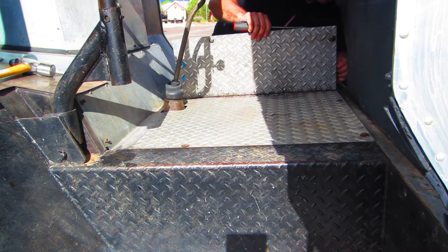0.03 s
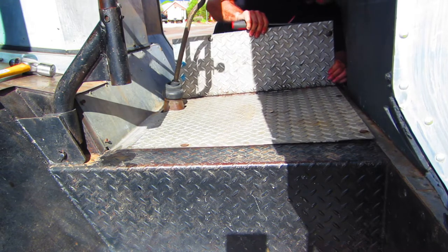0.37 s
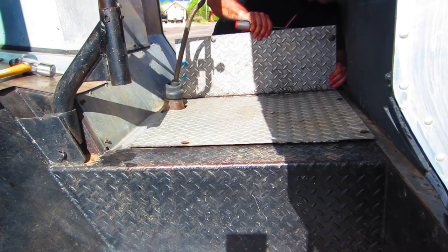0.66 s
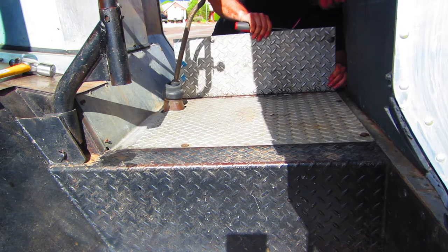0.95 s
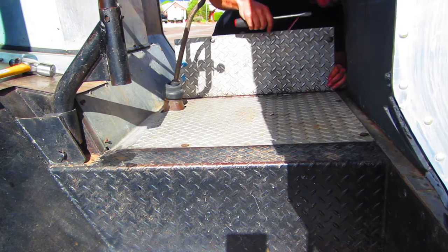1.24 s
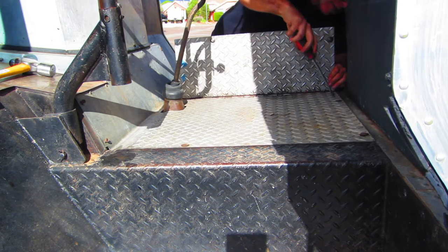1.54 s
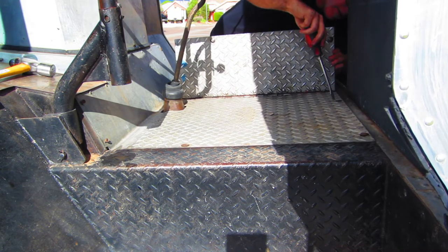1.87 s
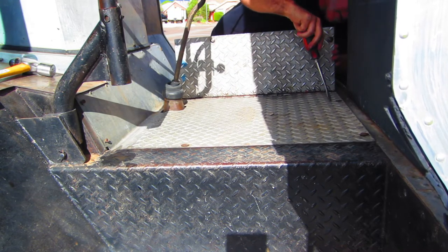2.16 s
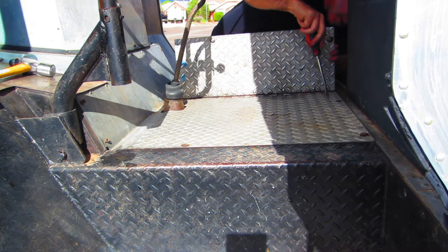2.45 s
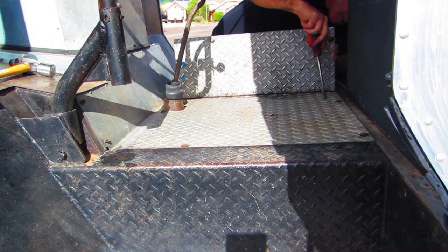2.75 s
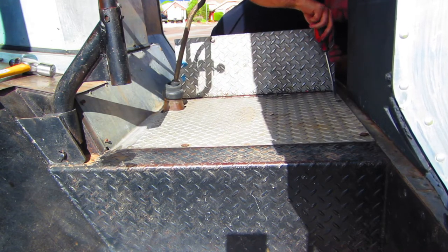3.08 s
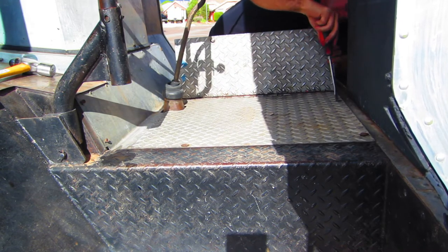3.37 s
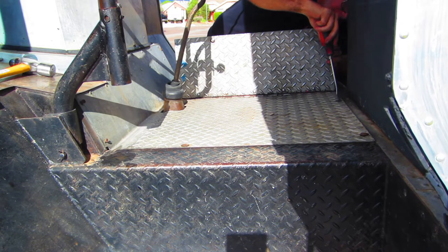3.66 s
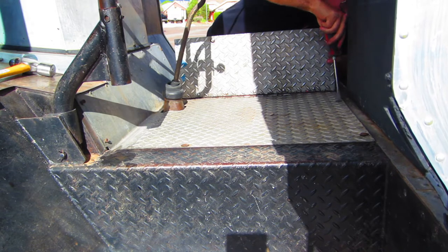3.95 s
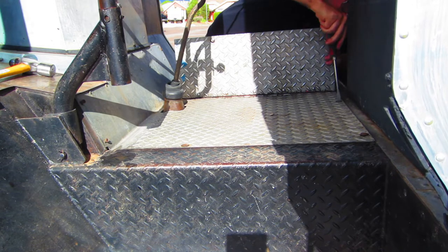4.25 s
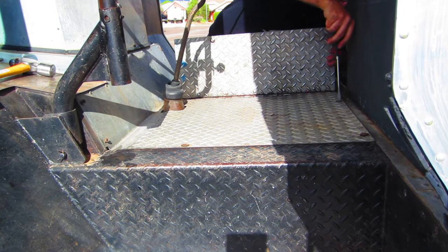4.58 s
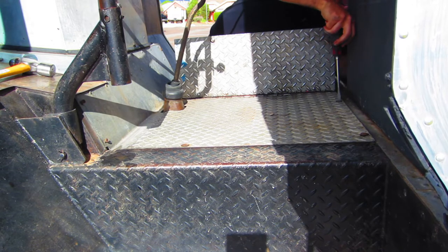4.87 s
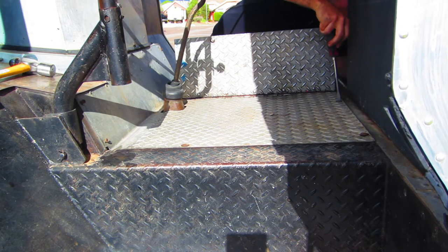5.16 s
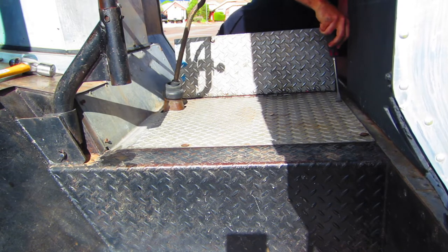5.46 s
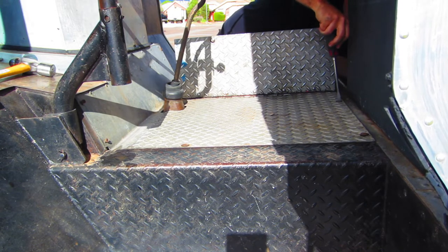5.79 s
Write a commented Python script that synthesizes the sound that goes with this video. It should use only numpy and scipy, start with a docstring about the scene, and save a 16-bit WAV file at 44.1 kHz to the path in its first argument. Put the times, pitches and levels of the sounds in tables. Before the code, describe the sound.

A metal floor panel is shoved into place in a bare vehicle cab, scraping and clattering close by over a low rumble. After a quieter moment of light brushing, a screwdriver gives one sharp, ringing snap at the panel's corner. Clusters of metallic clicks and tiny squeaks follow, then stop. Soft outdoor air, a faint machine hum and a distant bird lie behind it all.

```python
"""A tread-plate floor panel is shoved, scrapes and clatters into place in a bare metal vehicle cab.
Each knock rings its modes; each shove drags its edge in tiny slips, over a low handling or wind rumble.
A screwdriver then works at its corner: fasteners and plate edge click, squeak and snap home,
while hand and blade brush the tread. Behind it are a distant bird, a faint machine hum and outdoor air."""
import sys
import numpy as np
from scipy import signal
from scipy.fft import rfft, irfft, next_fast_len
from scipy.io import wavfile
from scipy.ndimage import uniform_filter1d

SR = 44100
rng = np.random.default_rng(int(sys.argv[2]) if len(sys.argv) > 2 else 0)


def pcm_store(signal):
    """Save signal as 16-bit PCM."""
    levels = np.round(np.clip(np.atleast_2d(signal), -1, 1) * 32767)
    wavfile.write(sys.argv[1], SR, levels.astype(np.int16).T)


N = 256662
T = np.arange(N) / SR
RING = T[:int(.5 * SR)]  # time axis of one ring-out
BASS_HZ, TREBLE_HZ = 395, 2520

# strongest modes of the loose panel: f/Hz, relative level/dB, t60/s
PANEL_MODES = [(112.6, -19, 0.97), (219.2, 1, 0.21), (245, -1.5, 0.3), (309.6, -8.5, 0.63),
               (407, -18, 0.83), (672, -12, 0.22), (754, -17, 0.22), (860, -20.5, 1.3), (837, -27.5, 0.64),
               (980, -3.5, 0.24), (1367, -4.5, 0.29), (1435, -23.5, 0.67)]
# shoves along the frame: t/s, hold/s, scrape level/dB, brightness/dB, rumble level/dB
SHOVES = [(0, 0.03, -29.5, -5.5, -44), (0.407, 0.057, -27, -4, -38.5), (0.667, 0.037, -24.5, -7, -42),
          (4.147, 0.021, -31.5, -19.5, -38), (4.372, 0.16, -34, -12, -45)]


def panel_clatter():
    """The loose panel knocks on its frame and rocks on."""
    # t/s, relative level/dB, bass/dB, treble/dB, rattle/s, f favoured by the contact point/Hz
    knocks = [(0.002, -26, 8, -4, 0.0041, 312), (0.053, -25, 11, 1.5, 0.043, 643),
              (0.311, -24.5, -6.5, 6.5, 0, 2810), (0.366, -36, 21.5, -11, 0.017, 190),
              (0.396, -23.5, 10.5, 6, 0.038, 211), (0.467, -24.5, -13, 5, 0, 2900),
              (0.480, -20, 3.5, -5.5, 0.097, 1150), (0.654, -24, 2, 4.5, 0.013, 1230),
              (0.687, -18, 8, 8, 0.0003, 1416), (0.708, -19, 6, -6.5, 0.0006, 790),
              (0.724, -19, 4.5, 3, .13, 246.8), (0.934, -47, 8, 10.5, 0.0075, 497),
              (1.012, -46, 17.5, 0, 0, 250), (1.057, -42, 17.5, 4, 0.041, 310),
              (1.177, -58.5, 18, 7.5, 0.0047, 262)]
    contacts = rattle(knocks, gap_s=.029, drop_db=15, chatter_s=.011, loose_s=.003)
    return blows(contacts, PANEL_MODES, modes_db=-6, crack_db=-2.5, crack_t60=0.036,
                 favour_db=7.5, favour_octaves=0.076)


def rattle(rows, gap_s, drop_db, chatter_s, loose_s):
    """A hit repeats every gap_s, sinking by drop_db over its rattle; loose hits chatter longer."""
    contacts = []
    for s, db, bass_db, treble_db, length, hz in rows:
        span = max(length, 1e-3)
        rebound_s = chatter_s + loose_s * (length > 0)
        for lag in np.arange(0, span, gap_s):
            contacts.append((s + lag, db - drop_db * lag / span, bass_db, treble_db, rebound_s, hz))
    return contacts


def blows(contacts, modes, modes_db, crack_db, crack_t60, favour_db, favour_octaves, scatter_db=1.5):
    """Struck plate: a crack, a wash of crowded modes and the ring of the strongest ones."""
    out = np.zeros(N)
    bands, decays = plate_bands()
    decays = decays * (1 + undb(crack_db) * fade(crack_t60))
    share = bands.std(axis=1) * np.linalg.norm(decays, axis=1)
    # the strong modes keep their own levels under the plate's colour
    rings = np.array([mode_ring(hz, db, t60) / plate_colour(hz) for hz, db, t60 in modes])
    for s, db, bass_db, treble_db, rebound_s, favoured_hz in contacts:
        # every contact point weights the modes differently, but each octave keeps its share of energy
        start = rng.integers(0, bands.shape[1] - len(RING))
        octaves = chatter(bands[:, start:start + len(RING)] * decays, rebound_s)
        wash = (share / np.linalg.norm(octaves, axis=1)) @ octaves
        weights = undb(scatter_db * rng.standard_normal(len(modes))) * rng.choice([-1, 1], len(modes))
        attack = 1 - np.exp(-3 * RING / max(rebound_s, 1e-3))
        ring = undb(modes_db) * attack * (weights @ rings)
        # heavy contact bends the panel, hard contact brightens it, and the spot favours some modes
        near = lambda hz: np.exp(-(np.log2((hz + 1) / favoured_hz) / favour_octaves) ** 2)
        tone_db = lambda hz: bass_db * bass(hz) + treble_db * hardness(hz) + favour_db * near(hz)
        add(out, s, shape(wash + ring, lambda hz: plate_colour(hz) * undb(db + tone_db(hz))))
    return out


def plate_bands(count=9, lowest_hz=60):
    """The plate's crowded modes as two seconds of noise in octave bands, with each band's decay."""
    # ring time of the weaker modes: f/Hz, t60/s
    ring_times = [(100, 0.56), (300, 0.46), (1000, 0.34), (3000, 0.28), (7000, 0.24), (13000, 0.3)]
    spectrum = rfft(rng.standard_normal(2 * SR))
    hz = np.maximum(np.arange(len(spectrum)) / 2, 1)
    octave = np.clip(np.log2(hz / lowest_hz), 0, count - 1)
    bands = [irfft(spectrum * np.maximum(1 - abs(octave - k), 0)) for k in range(count)]
    decays = [fade(at(ring_times, lowest_hz * 2 ** k)) for k in range(count)]
    return np.array(bands), np.array(decays)


def plate_colour(hz):
    """Body tone of plate and cab: the gain of their crowd of weaker modes."""
    # f/Hz, relative level/dB
    body = [(50, -28), (90, -7), (135, 1), (300, -0.5), (700, 0), (1500, -4.5), (2400, -4.5), (4200, -7.5),
            (5000, -12), (7000, -16.5), (9600, -28.5), (11700, -52.5), (13000, -45), (15500, -62.5)]
    return undb(at(body, hz) + 9)


def mode_ring(hz, db, t60):
    """One struck mode rings out as a decaying sine."""
    return undb(db) * fade(t60) * np.sin(2 * np.pi * hz * RING)


def chatter(bands, length, count=6):
    """One contact and its weaker rebounds within length seconds."""
    bounce = np.arange(count)
    when = (bounce + rng.uniform(0, 1, count) * (bounce > 0)) / count
    sizes = 0.7 ** bounce * rng.choice([-1, 1], count)
    out = np.zeros_like(bands)
    for lag, size in zip((when * length * SR).astype(int), sizes):
        out[:, lag:] += size * bands[:, :bands.shape[1] - lag]
    return out


def bass(hz):
    """Share of a frequency in the panel's low bending range."""
    return 1 / (1 + (hz / BASS_HZ) ** 4)


def treble(hz):
    """Share of a frequency in the range that only hard contact reaches."""
    return 1 - 1 / (1 + (hz / TREBLE_HZ) ** 4)


def hardness(hz, sizzle_hz=8000, sizzle_share=0.67):
    """Treble shelf of a hard contact, with extra sizzle at the very top."""
    return treble(hz) + sizzle_share * treble(hz * TREBLE_HZ / sizzle_hz)


def panel_scrape(bass_db=6, modes_db=-25, bite=1.35):
    """Dense uneven slips of the edge keep the panel ringing during each shove."""
    response = shape(rng.standard_normal(len(RING)) * fade(0.13), plate_colour)
    response += undb(modes_db) * sum(mode_ring(*mode) for mode in PANEL_MODES)
    rub = unit(signal.fftconvolve(slips(per_s=500, spread_db=4), response)[:N])
    dull = shape(rub, lambda hz: undb(bass_db * bass(hz)) * (1 - treble(2.1 * hz)))
    bright = shape(rub, treble)
    out = np.zeros(N)
    for s, hold, db, bright_db, _ in SHOVES:
        push = effort(s, hold, rise_db_s=161, fall_db_s=68)
        # the treble grows faster than the push
        out += undb(db) * (push * dull + undb(bright_db) * push ** bite * bright)
    return out


def slips(per_s, spread_db):
    """Tiny stick-slip releases of random timing and uneven size."""
    size = undb(spread_db * np.minimum(rng.exponential(size=N), 4))
    return (rng.random(N) < per_s / SR) * rng.choice([-1, 1], N) * size


def effort(s, hold, rise_db_s, fall_db_s):
    """Envelope of one shove: it builds until time s, holds and dies away."""
    return undb(-rise_db_s * np.maximum(s - T, 0) - fall_db_s * np.maximum(T - s - hold, 0))


def screwdriver():
    """Fasteners and plate edge click and snap under the tool, ringing the panel's corner."""
    # t/s, relative level/dB, bass/dB, treble/dB, rattle/s, f favoured by the contact point/Hz
    clicks = [(2.074, -44, 14.5, -6.5, 0.018, 133), (2.356, -35.5, 10, -13, .02, 820),
              (2.534, -13, -7, -6.5, 0, 665), (3.423, -42.5, 5, -7.5, 0.00062, 1460),
              (3.452, -42, 0, -6.5, 0, 3530), (3.676, -30, 7, -3.5, 0.0023, 1970),
              (3.851, -27, -3.5, 0, 0.00038, 1400), (3.863, -20.5, 4, 3.5, 0.00097, 650),
              (4.002, -54, 24, 11, 0.0025, 7900), (4.254, -47, -5, 3, 0, 3170),
              (4.312, -19, -10, -9, 0.0025, 1990), (4.323, -22, -3.5, 3, 0.029, 3800),
              (4.466, -20.5, -5.5, 4.5, 0, 4800)]
    # strongest modes of the corner: f/Hz, relative level/dB, t60/s
    corner_modes = [(140.9, 1.5, 0.43), (210.7, -3.5, 0.21), (246, -10.5, 0.83), (314.6, 2, 0.54),
                    (358, -38, 0.15), (454, -8, 0.57), (520, -8.5, 0.11), (650, 4, 0.15),
                    (660, -4.5, 0.057), (785, -12.5, 0.61), (864, -3, 0.28), (978, -15, 0.31),
                    (1025, -7, 0.25), (1236, -18, 0.14), (1395, -18, 0.17), (1418, 1.5, 0.18),
                    (1710, -2, 0.18), (1956, -7.5, 0.31), (2180, -8.5, 0.19), (2751, -5.5, 0.087),
                    (3130, 5, 0.13), (3380, -8, 0.17), (3574, 11, 0.034), (4200, -13, .07)]
    contacts = rattle(clicks, gap_s=.0115, drop_db=7, chatter_s=.006, loose_s=.004)
    return blows(contacts, corner_modes, modes_db=-7.5, crack_db=4.5, crack_t60=0.064,
                 favour_db=4.5, favour_octaves=.17)


def squeaks():
    """Metal slips on metal in short squeaks whose pitch sags as the slip slows."""
    # t/s, length/s, starting f/Hz, level/dB
    chirps = [(1.045, 0.015, 3104, -29.5), (3.862, 0.011, 4030, -23.5), (4.311, .004, 2100, -18),
              (4.348, 0.0095, 2895, -20), (4.465, 0.007, 4520, -15), (4.474, 0.01, 3405, -15),
              (4.478, 0.0037, 2026, -10.5), (4.491, 0.012, 1794, -18)]
    return glides(chirps, sag=0.066, waver=0.024 * walk(900))


def glides(rows, sag, waver):
    """Short tones that slide down by the share sag of their pitch, bent by the waver."""
    out = np.zeros(N)
    for s, length, start_hz, db in rows:
        n, i = int(length * SR), int(s * SR)
        hz = np.geomspace(start_hz, start_hz * (1 - sag), n) * (1 + waver[i:i + n])
        tone = np.sqrt(2) * np.sin(2 * np.pi * np.cumsum(hz) / SR)
        add(out, s, undb(db) * signal.windows.tukey(n, .8) * tone)
    return out


def brushes():
    """Hand and blade brush the tread plate: fine slips that swell and fade."""
    # t/s, length/s, relative level/dB, treble/dB
    strokes = [(1.3, 0.35, -75.5, 14), (1.603, 0.29, -56, 5.5), (1.947, 0.41, -54.5, -1.5),
               (2.326, .05, -38.5, -5.5), (2.83, 0.12, -45, -21.5), (3.579, 0.049, -38.5, -13),
               (4.723, 0.054, -55, 15)]
    out = np.zeros(N)
    grain = unit(shape(slips(per_s=1800, spread_db=3), plate_colour))
    for s, length, db, treble_db in strokes:
        n, i = int(length * SR), int(s * SR)
        stroke = grain[i:i + n] * np.hanning(n)
        add(out, s, shape(stroke, lambda hz: undb(db + treble_db * treble(hz))))
    return out


def cab(x, wet_db, t60):
    """Direct sound plus the dense echoes of bare metal walls."""
    echoes = rng.standard_normal(len(RING)) * fade(t60) * (RING > .003)
    return x + undb(wet_db) * signal.fftconvolve(x, echoes / np.linalg.norm(echoes))[:N]


def handling_rumble():
    """A low handling or wind rumble swells with each shove and dies away slowly."""
    swells = [undb(db) * effort(s, hold, rise_db_s=118, fall_db_s=11.5) for s, hold, _, _, db in SHOVES]
    # f/Hz, relative level/dB
    spectrum = [(15, -34), (35, -0.5), (65, -2), (120, -14.5), (300, -20.5), (1000, -69.5)]
    return np.max(swells, axis=0) * noise(spectrum)


def bird(start_hz=4650, trill_hz=115, trill_depth=0.11, twitter_db=3):
    """A distant bird's buzzy, broken falling notes: a fast trill sweeps each over a wide band."""
    # t/s, length/s, relative level/dB
    song = [(1.885, 0.22, -55), (2.45, 0.079, -56), (3.05, 0.22, -55.5), (3.20, 0.14, -58.5),
            (5.175, .09, -56), (5.33, 0.17, -62.5)]
    notes = [(s, length, start_hz, db) for s, length, db in song]
    trill = np.sin(2 * np.pi * np.cumsum(trill_hz * (1 + 0.13 * walk(62))) / SR)
    twitter = undb(twitter_db * walk(50))
    return twitter * glides(notes, sag=0.39, waver=trill_depth * trill + 0.055 * walk(70))


def machine_hum(drift=0.019, flutter_db=2):
    """A far machine hums, wandering slightly in pitch and level."""
    # f/Hz, relative level/dB
    partials = [(118.4, -48.5), (269.2, -55.5), (360.7, -66), (1066, -70), (1244, -64), (1303, -66)]
    drifting_time = np.cumsum(1 + drift * walk(13)) / SR
    hum = sum(undb(db) * np.sin(2 * np.pi * hz * drifting_time) for hz, db in partials)
    return np.sqrt(2) * undb(flutter_db * walk(8.2)) * hum


def outdoor_air():
    """A dark bed of outdoor air that sinks, then slowly swells a little."""
    # f/Hz, relative noise density/dB
    spectrum = [(12, -24.5), (22, -7), (47, -6), (85, -12.5), (125, -5.5), (180, -11), (240, -14),
                (600, -21.5), (1260, -25), (1700, -27.5), (4000, -40), (7300, -45.5), (10500, -57),
                (12000, -73), (15500, -66.5)]
    # t/s, level/dB
    swell = [(0, -38), (1.5, -50), (2.9, -46.5), (5.82, -45)]
    return noise(spectrum) * undb(np.interp(T, *np.transpose(swell)))


def undb(db):
    """Decibels to gain."""
    return np.exp(np.asarray(db) * (np.log(10) / 20))


def unit(x):
    """Scale to rms 1."""
    return x / np.sqrt(np.mean(x ** 2))


def at(points, hz):
    """Read a table on a log-frequency axis."""
    f, value = np.transpose(points)
    return np.interp(np.log(np.maximum(hz, 1)), np.log(f), value)


def fade(t60):
    """Exponential decay, 60 dB in t60 seconds."""
    return np.exp(-np.log(1000) * RING / max(t60, 1e-3))


def shape(x, gain):
    """Minimum-phase EQ with the given gain over frequency: nothing rings ahead of a hit."""
    n = 2 * next_fast_len(len(x) // 2 + 2048)
    hz = np.arange(n // 2 + 1) * SR / n
    cepstrum = irfft(np.log(gain(hz) + 1e-6))
    cepstrum[1:n // 2] *= 2
    cepstrum[n // 2 + 1:] = 0
    return irfft(rfft(x, n) * np.exp(rfft(cepstrum)))[:len(x)]


def noise(points):
    """Noise of rms 1 coloured by rows of f/Hz, level/dB."""
    return unit(shape(rng.standard_normal(N), lambda hz: undb(at(points, hz))))


def walk(rate):
    """Smooth random wander that heads for a new value rate times a second."""
    k = int(SR / rate)
    steps = np.repeat(rng.standard_normal(N // k + 1), k)
    return 0.86 * uniform_filter1d(steps, k)[:N]


def add(out, s, x):
    """Mix x into out from time s."""
    i = max(int(s * SR), 0)
    out[i:i + len(x)] += x[:len(out) - i]


def scene():
    """Mono mix: panel and tool up front; squeaks, brushes and bird in the cab's echo; air and hum below."""
    hits = panel_clatter() + undb(-2) * screwdriver()
    squeaking = cab(squeaks(), wet_db=-8, t60=0.34)
    faint = cab(brushes() + undb(1) * bird(), wet_db=1, t60=0.33)
    shoving = panel_scrape() + handling_rumble()
    bed = outdoor_air() + undb(-3) * machine_hum()
    return (hits + squeaking + undb(-3) * faint + shoving + bed)[None]


def record(dry, top_hz=15700):
    """A steep low-pass cuts the very top."""
    return signal.sosfilt(signal.ellip(8, .2, 70, top_hz, fs=SR, output="sos"), dry)


dry = scene()
out = record(dry)
pcm_store(out)
```